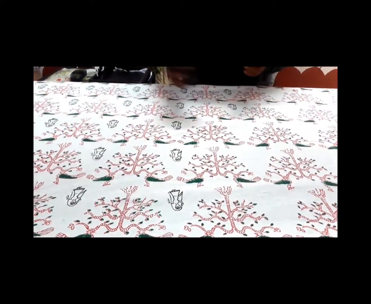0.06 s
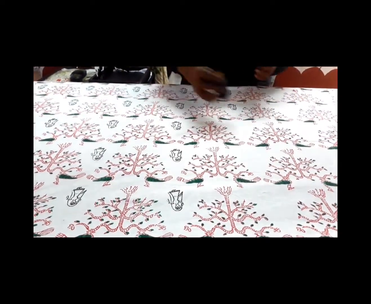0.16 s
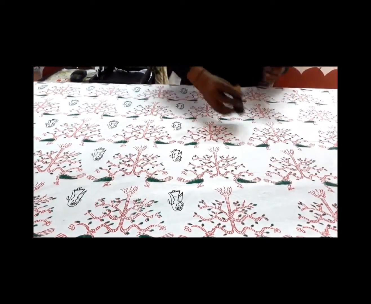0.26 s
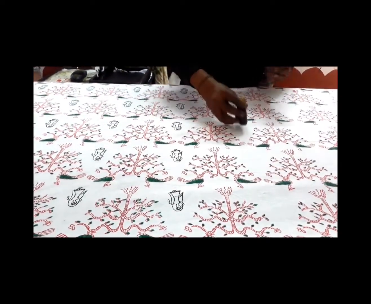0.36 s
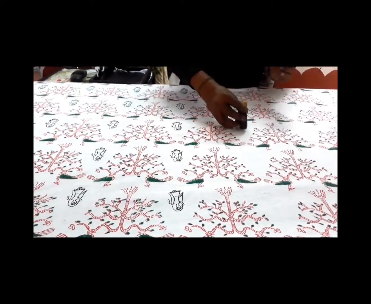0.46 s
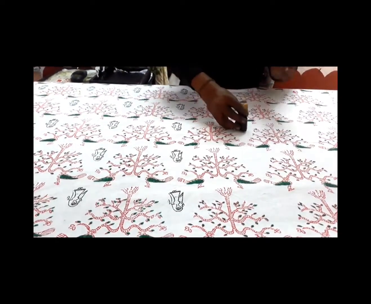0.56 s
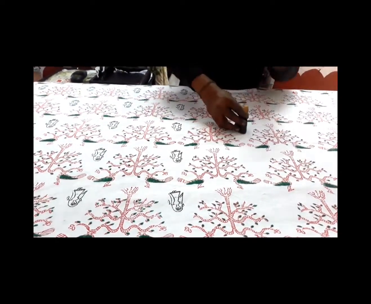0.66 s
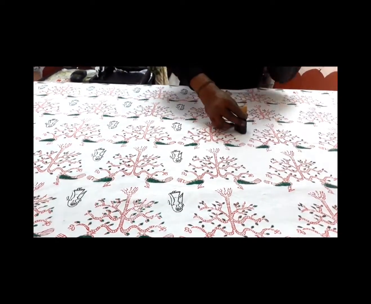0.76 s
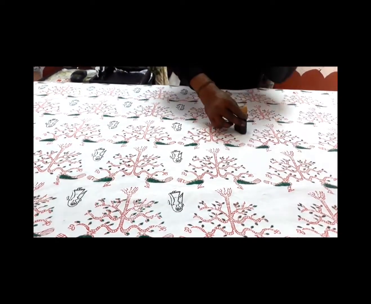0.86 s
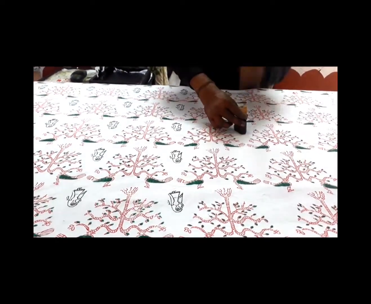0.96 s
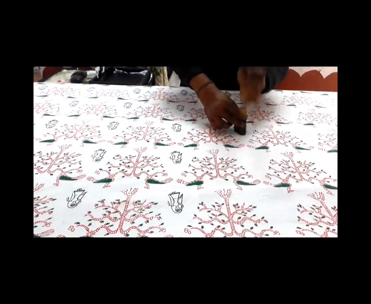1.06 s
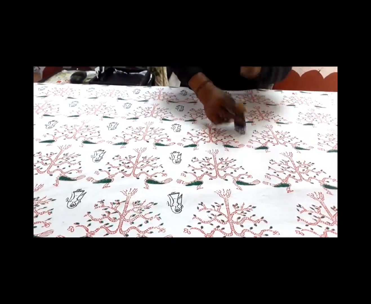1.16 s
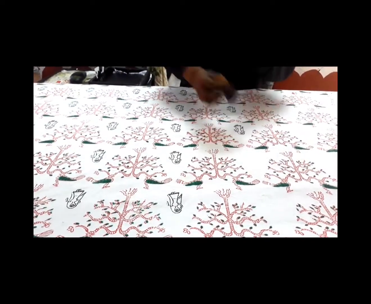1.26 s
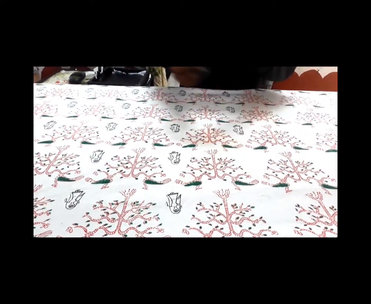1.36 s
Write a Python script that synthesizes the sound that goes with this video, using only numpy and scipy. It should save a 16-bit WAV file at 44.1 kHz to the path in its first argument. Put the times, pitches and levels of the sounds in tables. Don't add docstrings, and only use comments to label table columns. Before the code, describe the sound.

A small wooden block knocks a padded cloth-covered table, then a fist blow thumps it hard

```python
import sys
import numpy as np
from scipy import signal
from scipy.io import wavfile

SR = 44100
rng = np.random.default_rng(int(sys.argv[2]) if len(sys.argv) > 2 else 0)


def wav_out(sig):
    wavfile.write(sys.argv[1], SR, np.round(np.clip(np.atleast_2d(sig).T, -1, 1) * 32767).astype(np.int16))


def elevation(decibels):
    levels = np.asarray(decibels, float)
    return 10 ** (levels / 20)


N = 61740


def rms_one(x):
    return x / np.sqrt(np.mean(x ** 2) + 1e-20)


def at_hz(points, hz):
    table_hz, value = np.transpose(points)
    return np.interp(np.log(hz), np.log(table_hz), value)


def bandpass(x, order, low_hz, high_hz):
    return signal.sosfilt(signal.butter(order, [low_hz, high_hz], "band", fs=SR, output="sos"), x)


def drift(rate_hz):
    r = np.exp(-80 * np.pi * rate_hz / SR)
    white = rng.standard_normal(N // 40 + 2002)
    slow = signal.lfilter([1], [1, -2 * r, r * r], white)[2000:]
    return np.interp(np.arange(N) / 40, np.arange(len(slow)), rms_one(slow))


def ring(push, hz, t60_s):
    r, w = elevation(-60 / (t60_s * SR)), 2 * np.pi * hz / SR
    return signal.lfilter([0, np.sin(w)], [1, -2 * r * np.cos(w), r * r], push + 1e-18)


def contact(start_s, length_ms):
    phase = np.clip((np.arange(N) / SR - start_s) * 1000 / length_ms, 0, 1)
    return np.sin(np.pi * phase) ** 2


def noise(spectrum, patchy_db, low_hz, high_hz):
    # hz, level_db
    side_level = [(60, -30), (300, -18.5), (700, -11.5), (1500, -9.5), (3000, -13), (6000, -4.5),
                  (15000, -5.5)]
    out, together = 0, drift(3)
    edges_hz = 20 * 2 ** np.arange(0, 9.9, 1 / 3)
    white = rng.standard_normal((2, 2, N + 4000))
    for k, (low, high) in enumerate(zip(edges_hz, edges_hz[1:])):
        hz = np.sqrt(low * high)
        if low_hz < hz < high_hz:
            mid, side = bandpass(white[k % 2], 2, low, high)[:, 4000:]
            flicker_db = patchy_db * (0.27 * together + drift(11))
            stereo = mid + elevation(at_hz(side_level, hz)) * side * [[1], [-1]]
            out = out + elevation(at_hz(spectrum, hz) + flicker_db) * stereo
    return rms_one(out)


def knocks():
    # start_s, signed_push, contact_ms, rebound_lag_ms, rebound_share
    knock_events = [
        (.2090, -.347, .118, .314, .99),
        (.3581, .0136, .264, .322, -.17),
        (.8848, -.0183, .212, .404, 2.76),
    ]
    # rebound_ms, thud_hz, thud_share, decay_cycles
    pad_answers = [
        (.278, 60, -.28, 1.23),
        (.134, 184, 1.6, 4.7),
        (.433, 78, -2.62, 1.0),
    ]
    # start_s, level_db, pitch_hz
    bump_events = [(.2053, -47, 800), (.9675, -51, 300), (.1135, -47, 380), (.546, -56, 320),
                   (.635, -58, 800), (.366, -52, 70), (.943, -56, 300), (.6785, -52, 600), (.036, -50, 85),
                   (.06, -48, 90)]
    softness, bump_cycles = .43, 4.0
    out, t = 0, np.arange(N) / SR
    blur_ms = np.arange(-40, 41) * 1000 / SR
    for (start_s, push, ms, lag_ms, share), (back_ms, hz, thud, cycles) in zip(knock_events, pad_answers):
        since_ms = (t - start_s) * 1000
        v = np.clip((since_ms - lag_ms) / back_ms, 0, 100)
        edge = np.exp(-.5 * (blur_ms / (softness * ms ** 1.5 * 3)) ** 2)
        back = np.convolve(v * np.exp(1 - v), edge / edge.sum(), "same")
        r, w = elevation(-60 * hz / cycles / SR), 2 * np.pi * hz / SR
        pad = signal.lfilter([1, -r * np.cos(w)], [1, -2 * r * np.cos(w), r * r],
                             back / back.sum() + 1e-18)
        out = out + push * (np.exp(-.5 * (since_ms / ms) ** 2) - share * back - thud * pad)
    for start_s, level_db, hz in bump_events:
        touch = contact(start_s, 300 / hz)
        out = out - elevation(level_db) * ring(touch / touch.sum(), hz, bump_cycles / hz)
    return out


def table():
    # start_s, signed_push, contact_ms
    blow_events = [
        (1.0671, .116, 2.17),
        (1.0709, .053, 2.3),
        (1.0816, -.016, 2.46),
        (1.0929, .015, 1.88),
        (1.103, .029, 2.5),
        (1.1057, .029, 2.5),
        (1.1291, -.03, 1.46),
        (1.1482, -.03, 2.5),
    ]
    # hz, signed_share, t60_s
    top_modes = [(109.4, -.208, .19), (144, .38, .029), (207, .018, .5), (265.6, -.64, .052),
                 (279, .33, .077), (365.7, .47, .18), (448.7, -.61, .061), (583, .83, .015),
                 (640.6, -.645, .089), (880, -.1, .15)]
    # hz, level_db, t60_s
    frame_modes = [(40.4, -34.5, 0.48), (67, -30, 1.2)]
    # low_hz, high_hz, level_db, t60_s, rise_s
    board_bands = [(220, 540, -43, .27, .05), (780, 1100, -58, .17, .004)]
    crack_s, crack_db, crack_t60_s = 1.0675, -40, .06
    hand_s, hand_db, hand_fade_s = 1.1145, -18, .003
    t = np.arange(N) / SR
    since_s = np.clip(t - crack_s, 0, 1)
    force = sum(push * contact(s, ms) / (ms * SR / 2000) for s, push, ms in blow_events)
    damp = elevation(hand_db * np.clip((t - hand_s) / hand_fade_s, 0, 1))
    out = damp * sum(share * ring(force, hz, t60_s) for hz, share, t60_s in top_modes)
    for hz, level_db, t60_s in frame_modes:
        out = out + elevation(level_db) * ring(force, hz, t60_s)
    for low_hz, high_hz, level_db, t60_s, rise_s in board_bands:
        shiver = rms_one(bandpass(rng.standard_normal(N), 4, low_hz, high_hz))
        rise = np.clip((t - crack_s) / rise_s, 0, 1)
        out = out + elevation(level_db - 60 * since_s / t60_s) * rise * shiver
    crack = rng.standard_normal(N) * (t > crack_s) * elevation(crack_db - 60 * since_s / crack_t60_s)
    return out + bandpass(crack, 2, 750, 3300)


def ticks():
    # start_s, peak_db, top_hz
    tack_events = [
        (0.056, -46.5, 6300),
        (.094, -48.5, 6000),
        (.3245, -52, 6050),
        (.410, -46.5, 5670),
        (0.6775, -43, 3370),
        (.6965, -51, 6200),
        (.796, -63, 6200),
        (.838, -47, 5340),
        (1.212, -54.5, 5040),
        (1.2428, -47.5, 5560),
    ]
    # start_s, peak_db
    snap_events = [(0.102, -50), (0.3321, -48.5), (0.4177, -49.5), (0.8455, -50), (1.071, -81),
                   (1.0772, -53.5), (1.13, -53), (1.25, -52), (1.266, -52), (1.276, -54), (1.282, -55),
                   (1.317, -56)]
    # hz, width_hz, level_db
    snap_modes = [(3410, 890, 5), (5080, 660, -2.5), (6450, 580, -5.5), (8720, 300, -13.5),
                  (10280, 950, -2.5), (12400, 1100, -7)]
    out, click = np.zeros(N), 1. * (np.arange(300) == 0)
    for start_s, peak_db, top_hz in tack_events:
        tack = bandpass(click, 2, 1020, top_hz)
        out[int(start_s * SR):][:300] -= elevation(peak_db) * tack / np.abs(tack).max()
    for start_s, peak_db in snap_events:
        snap = 0
        for k, (hz, width_hz, level_db) in enumerate(snap_modes):
            gain_db = level_db + 2.6 * np.log2(hz / 4000) + 1.4 * rng.standard_normal()
            snap = snap + elevation(gain_db) * ring(click, hz, 4.1 / width_hz) * (-1) ** k
        out[int(start_s * SR):][:300] += elevation(peak_db) * snap / np.abs(snap).max()
    return out


def cloth():
    # time_s, swish_db, rumble_db
    movement = [(0, -55, -84), (0.042, -60.5, -56), (.075, -62.5, -65), (0.124, -66, -59.5),
                (.16, -85, -78), (.5, -93, -77.5), (.55, -106, -79), (.9, -102, -71.5), (.97, -97, -64),
                (1.0, -91, -101), (1.065, -98, -67), (1.09, -65, -87), (1.14, -75, -86), (1.17, -67.5, -67),
                (1.22, -73, -68), (1.4, -73.5, -77)]
    # hz, density_db
    swish_spectrum = [(900, -22.5), (1300, -4.5), (2000, -10), (2700, 6), (3300, -13), (4200, -12),
                      (7000, -24.5)]
    # hz, density_db
    rumble_spectrum = [(40, -11), (86, 0.5), (150, -6.5), (209, -1.5), (300, -9), (600, -21)]
    time_s, swish_db, rumble_db = np.transpose(movement)
    t = np.arange(N) / SR
    swish_gain = elevation(np.interp(t, time_s, swish_db) + 1.5 * drift(150))
    rumble_gain = elevation(np.interp(t, time_s, rumble_db) + 2.1 * drift(40))
    return (swish_gain * noise(swish_spectrum, 1.3, 900, 8000)
            + rumble_gain * noise(rumble_spectrum, 2.8, 40, 700))


def room():
    # hz, density_db
    air_spectrum = [(25, -20.5), (80, -13), (160, -10), (300, -9), (700, -14), (1500, -19), (3000, -17),
                    (4300, -29.5)]
    # hz, density_db
    hiss_spectrum = [(2350, -28), (4000, 2), (4380, -3.5), (5590, -1.5), (6270, -7.5), (7220, -8.5),
                     (7820, -15.5), (11900, -5.5), (15600, -8)]
    air_db, hiss_db = -67, -76
    hum_hz, hum_width_hz, hum_db = 209.5, 9.8, -73
    hum = rms_one(ring(rng.standard_normal(N), hum_hz, 2.8 / hum_width_hz))
    air = elevation(air_db) * noise(air_spectrum, 2.45, 20, 4500)
    hiss = elevation(hiss_db) * noise(hiss_spectrum, 1.0, 3800, 19000)
    return air + hiss + hum * elevation(hum_db + 1.9 * drift(1))


def scene():
    return knocks() + table() + ticks() + cloth() + room()


def roll_off(x):
    return signal.sosfilt(signal.butter(12, 15710, fs=SR, output="sos"), x)


def record(dry):
    offset = -.0004
    return roll_off(dry + offset)


dry = scene()
out = record(dry)
wav_out(out)
```